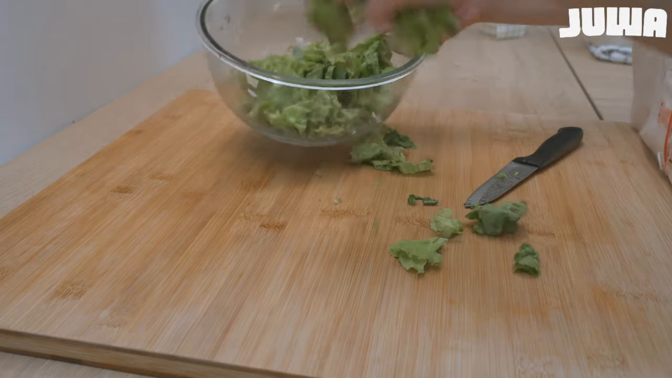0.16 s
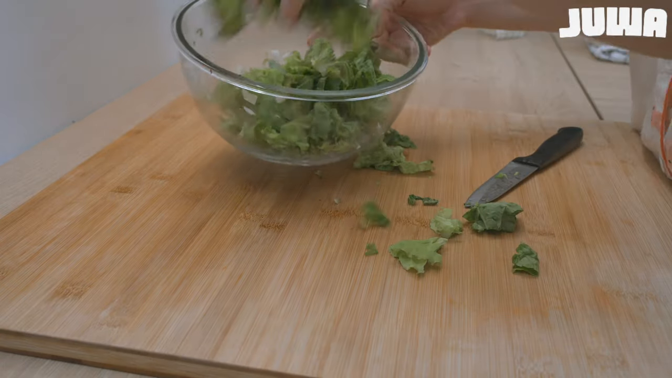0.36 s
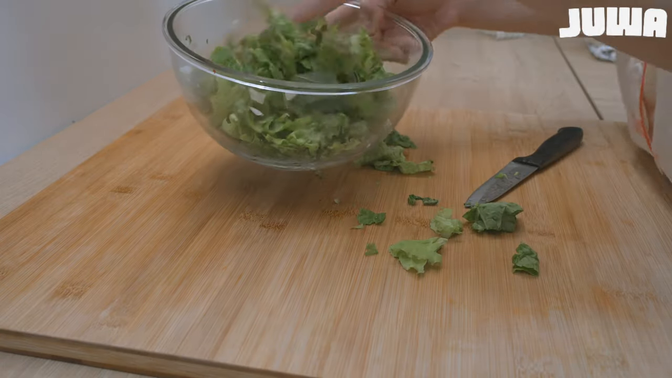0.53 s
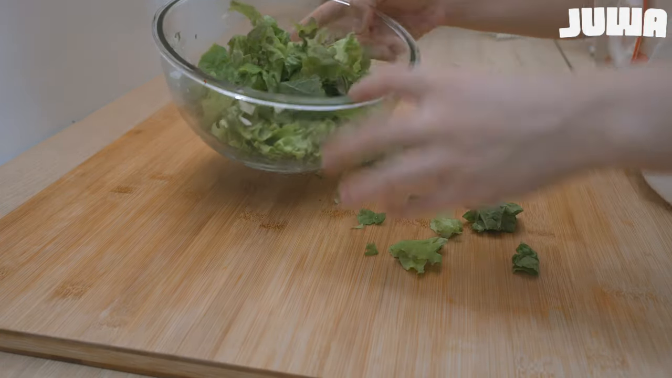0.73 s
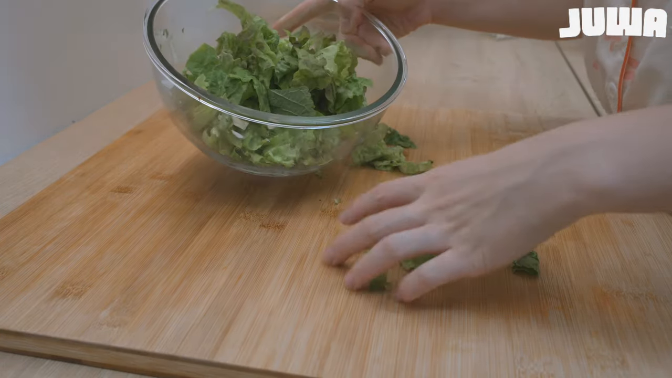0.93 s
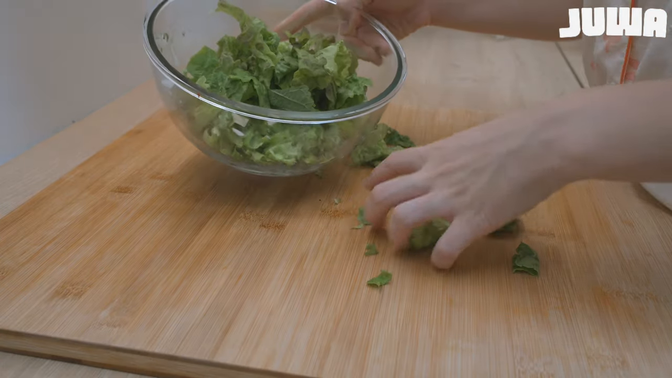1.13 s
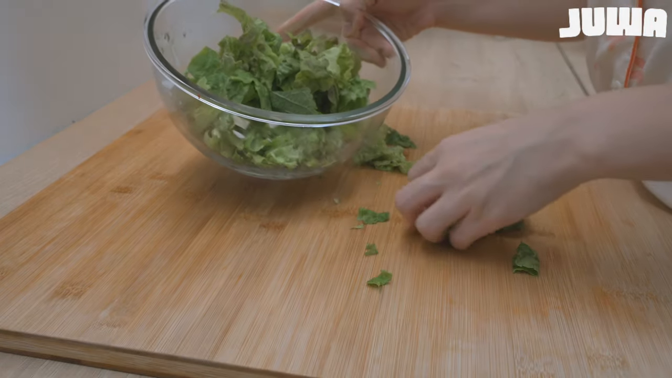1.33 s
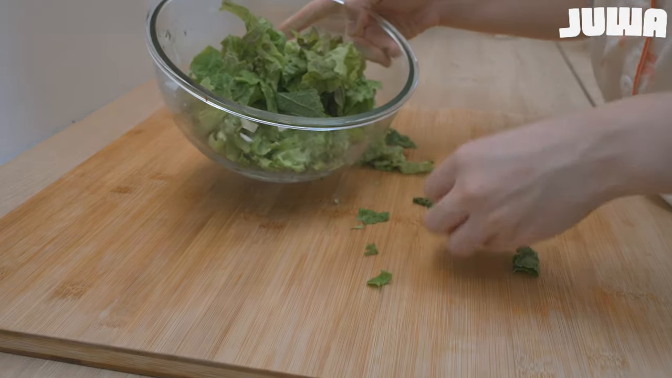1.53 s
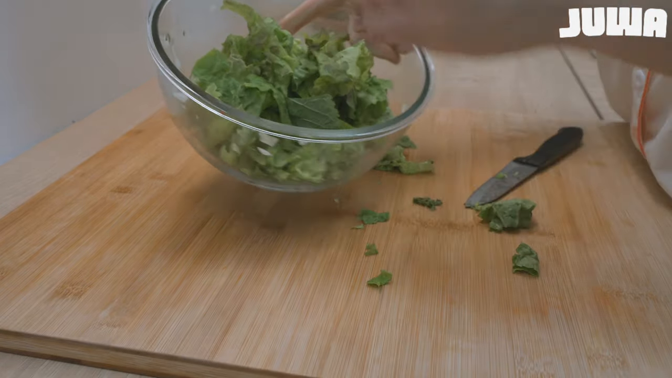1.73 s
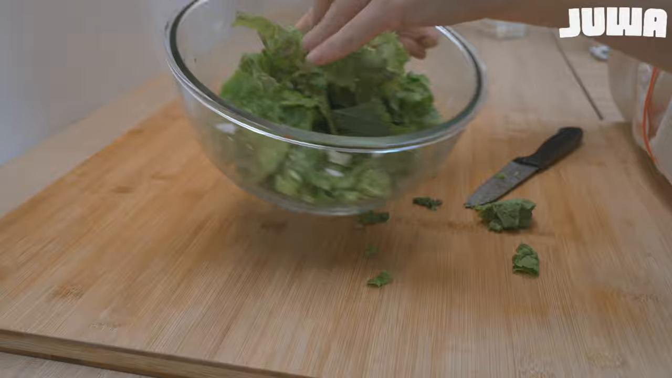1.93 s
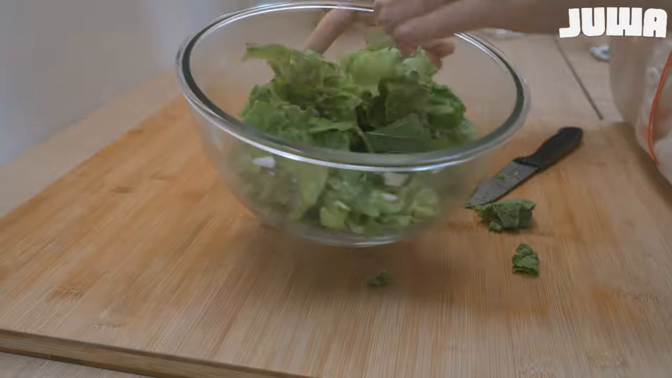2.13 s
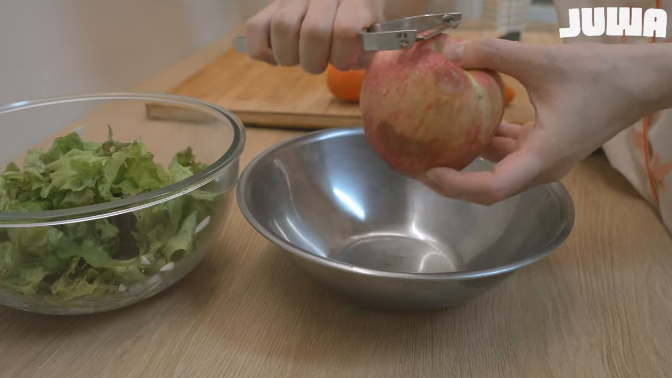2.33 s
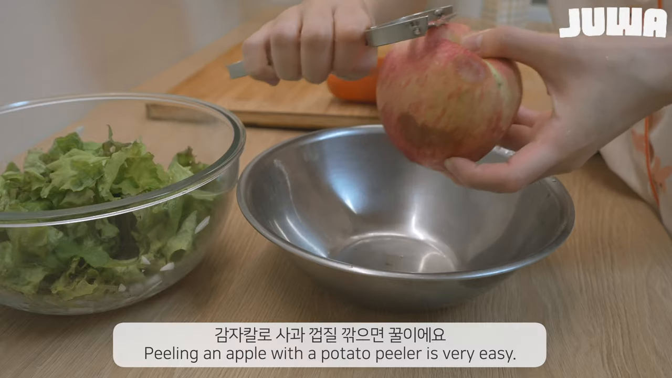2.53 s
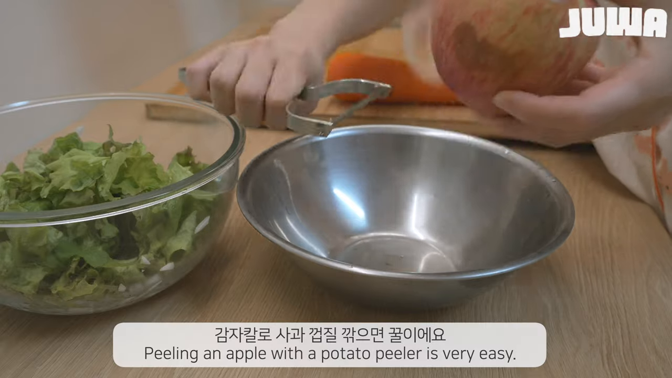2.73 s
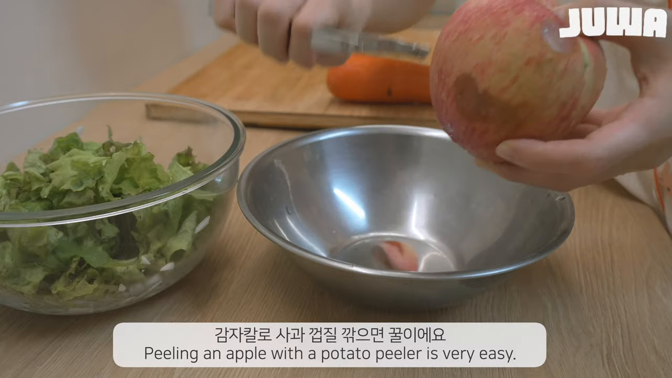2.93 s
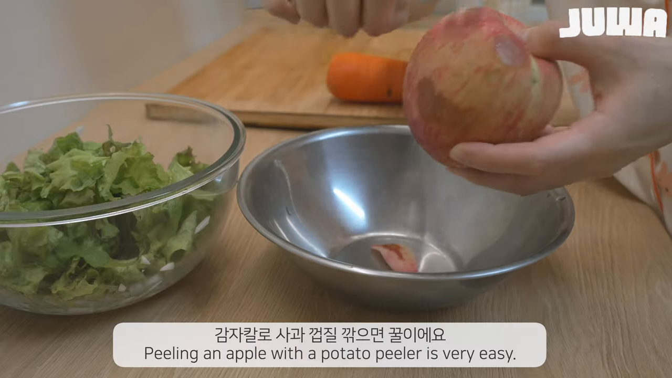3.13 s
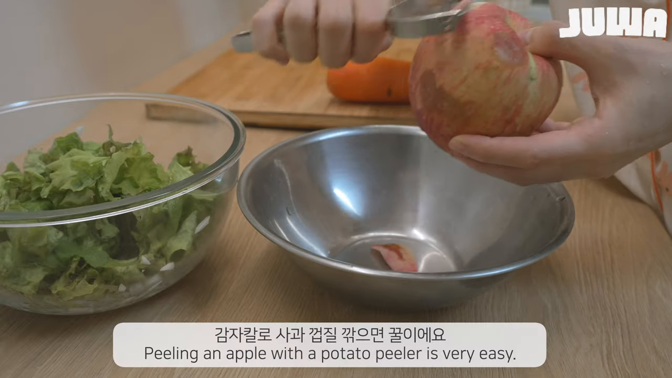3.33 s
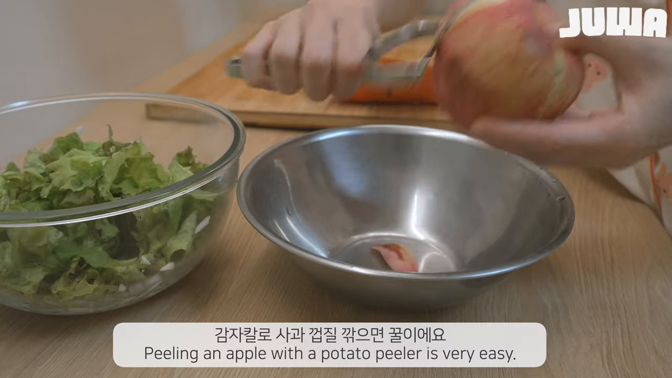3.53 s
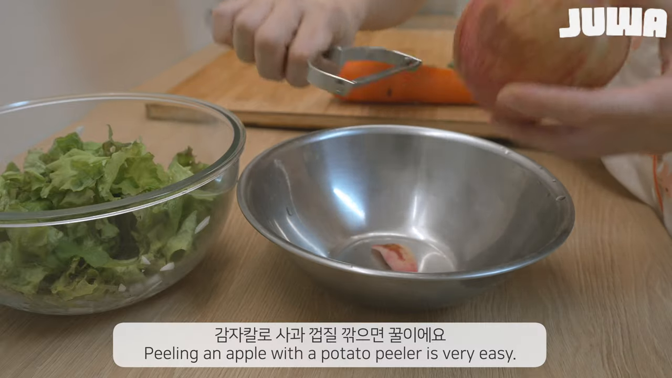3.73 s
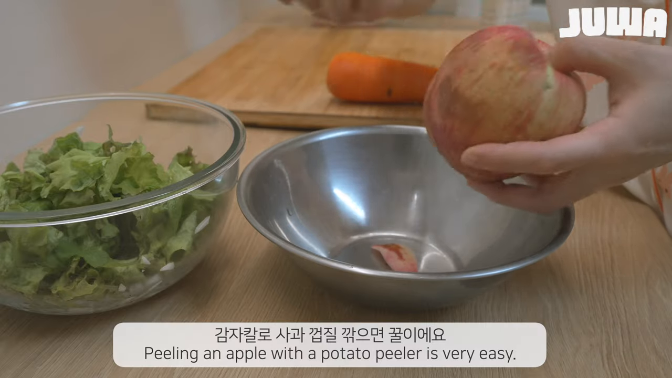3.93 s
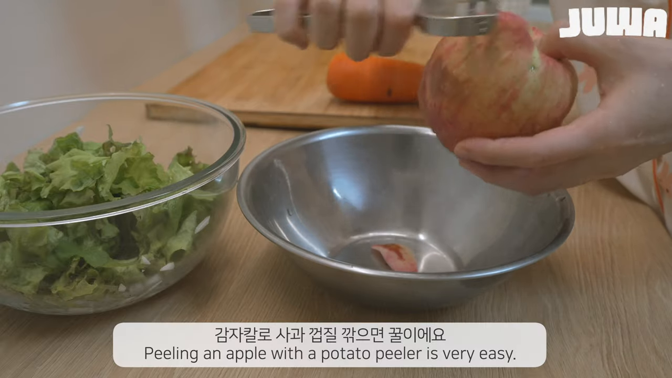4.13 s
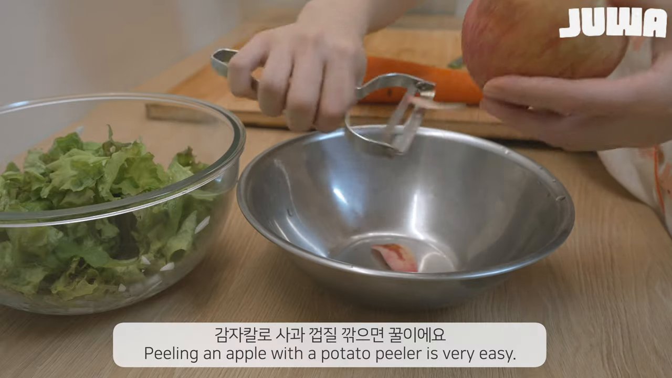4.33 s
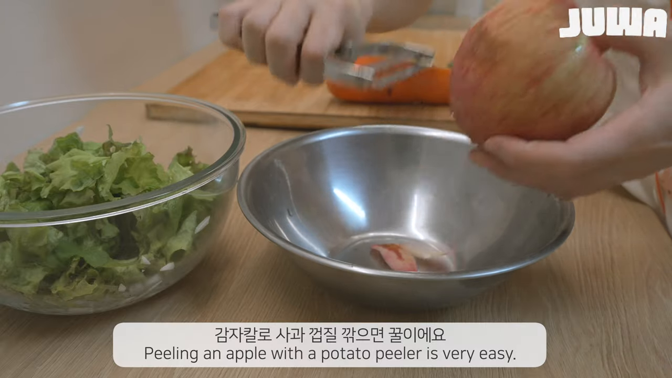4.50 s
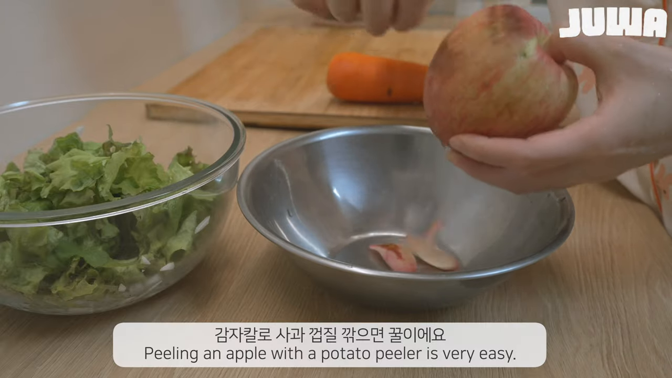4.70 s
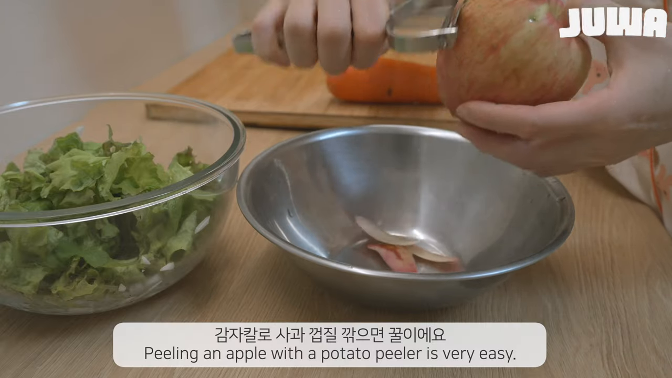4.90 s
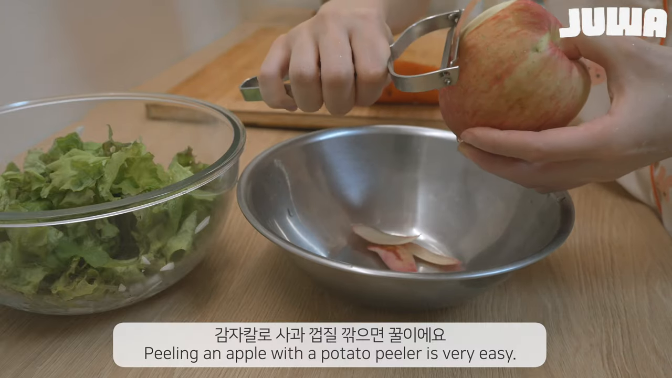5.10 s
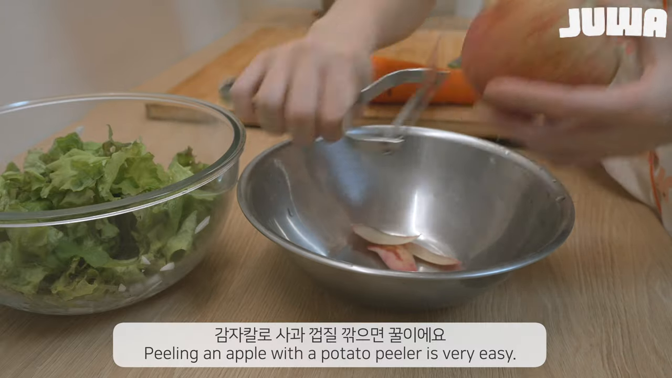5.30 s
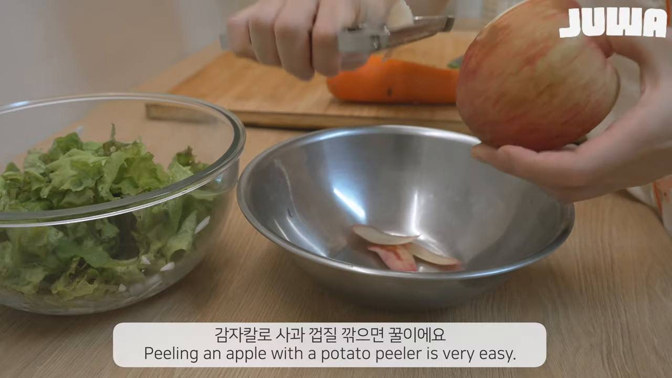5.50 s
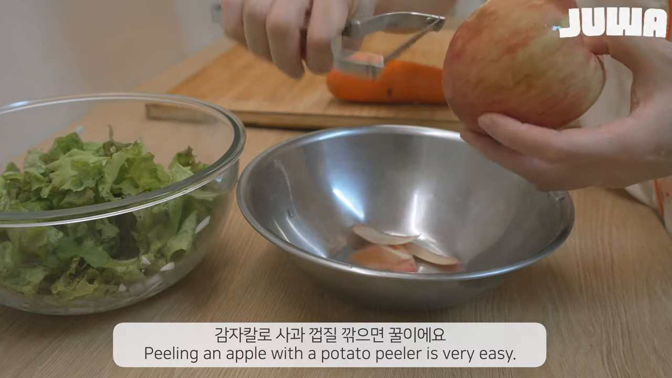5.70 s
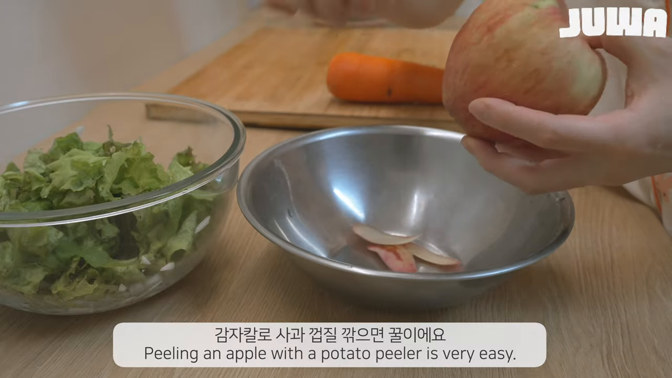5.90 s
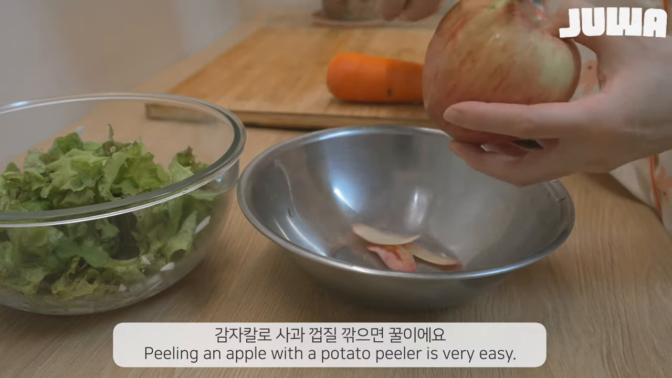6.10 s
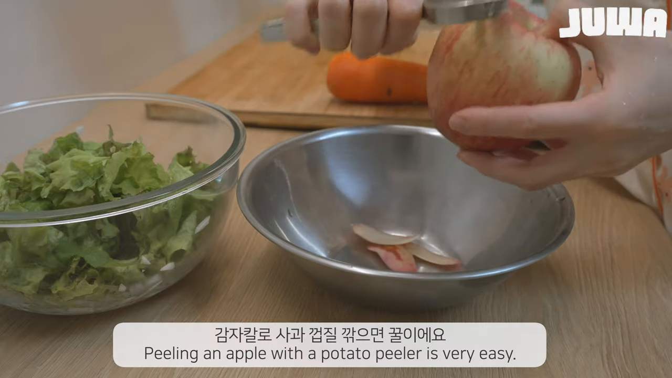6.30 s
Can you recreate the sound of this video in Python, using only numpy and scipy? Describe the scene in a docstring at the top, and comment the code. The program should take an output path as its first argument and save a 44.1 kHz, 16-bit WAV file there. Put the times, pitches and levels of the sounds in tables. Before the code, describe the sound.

Torn lettuce rustles softly into a glass bowl and off a wooden board, then a rattling metal peeler rasps an apple over a steel bowl.

```python
"""Kitchen work close to the microphone, built from random grains shaped by spectra and ringing modes.
First, torn lettuce crackles into a glass bowl, which rings briefly, and is swept up from a rubbed wooden board.
Then an apple is peeled: grains burst in a rasp, and the blade chatters in its ringing steel frame
as strokes land and leave, while strips of peel slap a steel bowl whose wall rings and base booms.
Dull bumps of the hand fall throughout; a small room answers over steady room tone."""
import sys
import numpy as np
from scipy import signal
from scipy.fft import rfft, irfft
from scipy.io import wavfile
from scipy.ndimage import uniform_filter1d

SR = 44100
rng = np.random.default_rng(int(sys.argv[2]) if len(sys.argv) > 2 else 0)


def file_out(sig):
    """Save sig as 16-bit WAV at sys.argv[1]."""
    # one column per channel
    cols = np.atleast_2d(sig).T
    # limit, then scale
    lim = np.clip(cols, -1, 1)
    pcm = np.round(lim * 32767).astype(np.int16)
    wavfile.write(sys.argv[1], SR, pcm)


N = 280035
TIME = np.arange(N) / SR
TOUCH_S = 0.0026  # time for the contact of a gesture to form


def gain_of(db):
    """Decibels to amplitude."""
    return 10 ** (np.asarray(db) / 20)


def evened(x):
    """Scales to rms 1."""
    return x / np.sqrt(np.mean(x ** 2) + 1e-20)


def wander(size):
    """Slow random swell of rms 1: noise averaged over a number of samples."""
    return evened(uniform_filter1d(rng.standard_normal(N), size=size))


def read(points, hz):
    """Reads a table on a log-frequency axis."""
    f, value = np.transpose(points)
    return np.interp(np.log(hz + 1), np.log(f + 1), value)


def add(mix, s, sound):
    """Mixes a sound in at time s."""
    part = mix[round(s * SR):][:len(sound)]
    part += sound[:len(part)]


def through(x, response):
    """Plays x through an impulse response, keeping the length of x."""
    return signal.fftconvolve(x, response)[:len(x)]


def band(x, lo_hz, hi_hz):
    """Band-pass."""
    edges = [lo_hz, min(hi_hz, SR / 2 - 1)]
    return signal.sosfilt(signal.butter(3, edges, "band", fs=SR, output="sos"), x)


def treble(x, corner_hz):
    """The part of x above a soft corner."""
    hz = np.fft.rfftfreq(len(x), 1 / SR)
    return irfft(rfft(x) * hz ** 4 / (hz ** 4 + corner_hz ** 4), len(x))


def colour(points, size=4096):
    """Causal response of energy 1 with the given spectrum."""
    hz = abs(np.fft.fftfreq(size, 1 / SR))
    log_gain = np.log(gain_of(np.maximum(read(points, hz), -100)))
    # the Hilbert transform of the log gain gives the minimum phase
    spectrum = np.exp(np.conj(signal.hilbert(log_gain)))
    response = np.fft.ifft(spectrum).real[:size // 2]
    return response / np.linalg.norm(response)


def body(modes, ring_db=0, drift=0):
    """Response of a driven object: the contact itself, then modes that each take a share of its energy."""
    t = TIME[:SR // 3]
    hz, db, t60 = np.transpose(modes)[:, :, None]
    hz = hz * (1 + drift * rng.standard_normal(hz.shape))
    rings = gain_of(-60 * t / t60) * np.cos(2 * np.pi * hz * t)
    rings = rings / np.linalg.norm(rings, axis=1, keepdims=True)
    response = (gain_of(db + ring_db) * rings).sum(0)
    response[0] += 1  # the contact itself
    return response / np.linalg.norm(response)


def struck(modes, tilt_db=0):
    """One blow: decaying modes of slightly random size, of which a harder contact favours the high ones."""
    t = TIME[:SR]
    hz, db, t60 = np.transpose(modes)[:, :, None]
    level_db = db + tilt_db * np.log2(hz) + rng.standard_normal(db.shape)
    size = gain_of(level_db) * rng.choice([-1, 1], db.shape)
    rings = gain_of(-60 * t / t60) * np.sin(2 * np.pi * hz * t)
    return (size * rings).sum(0) / np.linalg.norm(size)


def grains(per_s, spread_db, count=N):
    """Tiny random snaps; a wider spread makes a few of them much larger than the rest."""
    size = gain_of(spread_db * np.minimum(rng.exponential(1, count), 4))
    present = rng.random(count) < per_s / SR
    return evened(size * rng.choice([-1, 1], count) * present)


def pops(lo_hz, hi_hz, per_s, cycles, count=14):
    """Small fractures, each a few decaying cycles at one of a ladder of pitches."""
    t, out = TIME[:512], np.zeros(N)
    for hz in np.geomspace(lo_hz, hi_hz, count):
        pop = np.exp(-t * hz / cycles) * np.sin(2 * np.pi * hz * t)
        layer = signal.oaconvolve(grains(per_s, 1.2), pop)[:N]
        out += np.sqrt(hz) * evened(layer)
    return evened(out)


def chatter(length, rise, fade, per_s):
    """A burst of rapid contacts that lasts for a moment and dies away."""
    t = TIME[:SR // 8]
    shape = (1 - np.exp(-t / rise)) * np.exp(-np.maximum(t - length, 0) / fade)
    return shape * grains(per_s, 0.36, count=len(t))


def pressure(start, length, rise, first_db, fade):
    """One gesture: it touches lightly, builds to full force, holds and lets go."""
    t = np.maximum(TIME - start, 0)
    build = gain_of(first_db * np.maximum(1 - t / rise, 0))
    return np.minimum(t / TOUCH_S, 1) * build * np.exp(-np.maximum(t - length, 0) / fade)


def gestures(rows, first_db, fade):
    """Gain of a series of gestures, each at its own level."""
    return sum(gain_of(db) * pressure(s, length, rise, first_db, fade) for s, length, rise, db in rows)


# cuts of the blade through the skin: (t/s, length/s, rise/s, level/dB, brightness/dB)
CUTS = [(2.296, 0.024, 0.011, -52.5, 5.5), (2.329, 0.014, 0.0085, -35, -4), (2.413, 0.076, 0.038, -42, 1),
        (2.515, 0.093, 0.028, -34, 4.5), (2.605, 0.053, 0.021, -21.5, 6), (3.303, .14, 0.012, -27.5, 5.5),
        (3.481, .065, 0.0056, -51.5, 15.5), (3.526, 0.059, 0.017, -24, 6.5), (3.582, .007, 0.0033, -27, -1),
        (4.132, .157, 0.062, -28, 4), (4.781, 0.15, 0.088, -28, 3.5), (5.056, 0.092, 0.022, -49.5, 8.5),
        (5.154, 0.12, .012, -58, 15), (5.203, 0.014, .01, -46.5, 0), (5.261, 0.04, 0.039, -35.5, 8),
        (5.3, 0.0064, 0.0033, -23.5, -7), (6.09, 0.019, 0.0031, -40, 8), (6.233, 0.06, 0.029, -29, -2)]
# spectrum of blade on apple: (f/Hz, level/dB)
CUT_COLOUR = [(88, -79.5), (150, -27), (457, -18.5), (612, -8), (871, -6.5), (1140, -5.5), (1260, -1.5),
              (1760, -5), (2140, -2), (2650, -4.5), (4490, -9), (5570, -7.5), (7320, -10.5), (14800, -17),
              (16000, -21)]
# modes of the peeler while its blade is held in the apple: (f/Hz, level/dB, t60/s)
HELD_PEELER = [(715, -23, .04), (879, -19, .06), (1262, -18, .07), (2215, -23, .04), (2670, -23, .04),
               (2860, -24, .04), (5350, -22, .025), (5950, -22, .025)]
CUT_FIRST_DB, CUT_FADE_S = -16.5, 0.012  # the blade bites lightly at first and slips out quickly
SLIP_DB = 1.2  # unevenness of the crunch
DULL_DB, BITE_SHARE = -13.5, 0.2  # cuts start dull; share of the length that sets how fast they brighten


def cutting():
    """The blade bursts thousands of apple cells a second and tears the skin; the held peeler colours the rasp."""
    cells = grains(7000, 2.2) + .5 * pops(800, 6500, 220, 2.5)
    flesh = through(cells, colour(CUT_COLOUR))
    slips = wander(260)  # the blade catches and slips
    out = np.zeros(N)
    for s, length, rise, db, bright_db in CUTS:
        span = slice(round(s * SR), round((s + length + 10 * CUT_FADE_S) * SR))
        # a new grip for each cut
        rasp = through(flesh[span], body(HELD_PEELER, ring_db=-3.0, drift=0.0089))
        rasp = rasp / band(rasp, 530, 3070).std()
        fizz = treble(rasp, 3800)
        # slips swell the low crunch more than the fizz
        crunch = (rasp - fizz) * gain_of(SLIP_DB * slips[span])
        dulling_db = DULL_DB * np.exp((s - TIME[span]) / (BITE_SHARE * length))
        fizz = fizz * gain_of(bright_db + dulling_db + .5 * slips[span])
        force = pressure(s, length, rise, CUT_FIRST_DB, CUT_FADE_S)[span]
        out[span] += gain_of(db) * force * (crunch + fizz)
    return gain_of(-3.22) * out


# the loose blade chattering in its frame: (t/s, level/dB, length/s, brightness/dB)
CLACKS = [ (2.232, -53, 0.033, -4), (2.665, -16.5, 0.004, -12), (2.674, -18.5, 0.014, 0),
          (2.713, -26, 0.036, 3), (2.764, -27.5, .011, 2.5), (2.784, -33.5, 0.026, -1),
          (3.076, -35, 0.0045, -9), (3.227, -12.5, 0.0048, -4), (3.604, -12.5, 0.0061, 3.5),
          (3.64, -23, 0.0042, -3.5), (3.654, -25.5, 0.024, 2), (3.934, -41, 0.0097, -12),
          (3.954, -31.5, 0.031, -1.5), (4.092, -14, 0.0098, -3), (4.134, -28.5, .0022, -5),
          (4.283, -21.5, 0.014, -1.5), (4.398, -27, .015, 3.5), (4.7663, -9, 0.0026, -1.5),
          (5.31, -14.5, .0025, -3), (5.316, -23.5, .018, -8.5), (5.37, -21, .006, 5),
          (5.378, -14, 0.0096, 4.5), (5.401, -35.5, 0.036, -10), (5.454, -26.5, 0.0018, -19),
          (5.582, -46, 0.0042, 3), (5.818, -33.5, 0.046, -1.5), (5.93, -27, .022, 9),
          (6.042, -42.5, 0.0035, -17), (6.063, -35, 0.0039, -6), (6.09, -19.5, 0.021, 5.5),
          (6.106, -10.5, 0.0023, -3)]
# spectrum of the blade contacts: (f/Hz, level/dB)
CLACK_COLOUR = [(100, -32), (300, -11), (600, -14), (1250, -5), (1900, -10.5), (2900, 3), (4200, 2.5),
                (6000, 5.5), (8000, 3), (11500, 3.5), (14500, 4), (15500, 3.5)]
# modes of the free peeler: (f/Hz, level/dB, t60/s)
FREE_PEELER = [(1260, -20, .06), (2990, -19, .1), (3550, -26, .06), (4710, -24, .2), (5310, -19, .08),
               (5950, -14, .06), (6430, -16, .1), (7110, -22, .14), (8620, -19, .12), (9320, -24, .1),
               (9820, -19, .17), (10240, -16, .27), (10410, -16, .05), (12130, -13, .16),
               (13760, -16.5, .13), (15130, -18, .13), (15350, -15, .07)]


def peeler():
    """The swivel blade rattles against its stops; the ringing of the frame shifts a little with the grip."""
    out, contact = np.zeros(N), colour(CLACK_COLOUR)
    for s, db, length, bright_db in CLACKS:
        burst = through(chatter(length, 0.001, 0.004, 9000), contact)
        bright = burst + (gain_of(bright_db) - 1) * treble(burst, 9000)
        ring_db = -2.5 + 0.2 * bright_db + 100 * length  # bright, long rattles ring most
        frame = body(FREE_PEELER, ring_db=ring_db, drift=.005)
        level = gain_of(db + 2.0) * burst.std() / bright.std()
        add(out, s, level * signal.fftconvolve(bright, frame))
    return out


# the blade landing on the apple just before it swings over: (t/s, level/dB)
LANDINGS = [(3.2245, -39.5), (4.089, -28), (4.752, -46), (4.7632, -22.5), (6.085, -28.5)]


def landings():
    """A short, dull tick as the blade meets the skin, ringing the held peeler."""
    out = np.zeros(N)
    for s, db in LANDINGS:
        add(out, s, gain_of(db) * chatter(0.0016, 0.00048, 0.0011, 8000))
    return through(through(out, colour(CUT_COLOUR)), body(HELD_PEELER, ring_db=10.5))


# handfuls of lettuce lifted, dropped and gathered: (t/s, length/s, rise/s, level/dB)
RUSTLES = [(0.0, 0.017, 0.0013, -47.5), (.07, 0.28, 0.056, -51), (.378, 0.14, 0.025, -46),
           (.46, 0.039, 0.027, -39), (.55, .17, 0.037, -57), (.975, 0.27, 0.11, -49.5),
           (1.29, 0.062, .035, -44), (1.37, 0.14, .01, -57.5), (1.815, 0.14, 0.046, -53.5),
           (1.96, 0.31, .01, -60.5)]
# single ribs of lettuce snapping: (t/s, level/dB)
SNAPS = [(0.082, -51), (.268, -50), (.395, -49), (0.476, -36), (.8366, -44), (1.463, -38), (1.903, -41),
         (1.918, -38)]
# spectrum of the leaves: (f/Hz, level/dB)
LEAF_COLOUR = [(88, -57), (150, -10), (361, -8.5), (689, -2), (821, -8), (1190, -4), (1420, -6.5),
               (4080, -9), (6640, -13), (14500, -22), (16000, -40)]
LEAF_FIRST_DB, LEAF_FADE_S, LEAF_CLUMP_DB = -7.5, 0.026, 1.5  # first touch, settling, uneven crackle


def lettuce():
    """Leaves crackle in clumps as they bend and brush each other; now and then a rib snaps."""
    cracks = grains(6000, 3.2) + .6 * pops(900, 8000, 110, 2.5)
    clumps = gain_of(LEAF_CLUMP_DB * wander(240))
    crackle = through(cracks * clumps, colour(LEAF_COLOUR))
    crackle = crackle / band(crackle, 2660, 13500).std()
    snaps = np.zeros(N)
    for s, db in SNAPS:
        add(snaps, s, gain_of(db) * chatter(0.00084, .0001, 0.0011, 20000))
    handling = gestures(RUSTLES, LEAF_FIRST_DB, LEAF_FADE_S)
    return gain_of(-3.5) * handling * crackle + band(snaps, 1600, 10700)


# pushes of the hand over the board: (t/s, length/s, rise/s, level/dB)
RUBS = [(.965, 0.308, 0.1, -44), (1.06, 0.045, 0.041, -39), (1.292, 0.045, .006, -30.5),
        (1.352, 0.022, 0.026, -41), (1.39, 0.042, 0.0059, -48)]
# knocks of the hand on the board: (t/s, level/dB, length/s)
KNOCKS = [(0.94, -36, 0.0015), (1.284, -29, 0.012)]
# modes of the board: (f/Hz, level/dB, t60/s)
BOARD = [(718, -14, .05), (1042, -22, .03), (2370, -17, .02), (3300, -15, .02)]
# spectrum of contact with the wood: (f/Hz, level/dB)
WOOD_COLOUR = [(35, -63), (60, -15), (372, -8.5), (431, -15.5), (720, -3.5), (955, -11.5), (1610, -10),
               (1950, -16), (2400, -12), (2780, -17.5), (9000, -36.5), (11700, -36), (19800, -120)]
RUB_FIRST_DB, RUB_FADE_S = -13, 0.014  # first touch, letting go


def board():
    """Fingers and scraps rub and knock on the wood, gripping and letting go."""
    friction = grains(5000, 2.6)
    grip = gain_of(-1.0 + 2 * wander(700))
    drive = grip * gestures(RUBS, RUB_FIRST_DB, RUB_FADE_S) * friction
    for s, db, length in KNOCKS:
        add(drive, s, gain_of(db) * chatter(length, 0.00024, 0.0035, 7000))
    wood = through(body(BOARD), colour(WOOD_COLOUR))
    return through(drive, wood / np.linalg.norm(wood))


# taps on the glass bowl: (t/s, level/dB)
GLASS_TAPS = [(.7372, -36), (0.7575, -28)]
# modes of the glass bowl: (f/Hz, level/dB, t60/s)
GLASS = [(538, 1, .17), (1324, -1, .17), (2400, -3.5, .17), (3740, -7, .08), (5310, -13, .12),
         (7100, -18, .11), (8560, -23, .06), (9070, -22, .08)]


def glass_bowl():
    """The glass bowl rocks on the board and rings briefly, damped by the hand that holds it."""
    out, wood = np.zeros(N), colour(WOOD_COLOUR)
    for s, db in GLASS_TAPS:
        out = out * (TIME < s)  # each new contact stops the ringing of the one before
        add(out, s, gain_of(db + 2.0) * struck(GLASS))
        knock = band(chatter(0.0015, 0.0003, 0.0016, 8700), 580, 14000)
        add(out, s, gain_of(db) * through(knock, wood))
    return out


# peel dropping into the steel bowl: (t/s, ring level/dB, boom level of the base/dB, hardness/dB per octave)
DROPS = [(2.897, -24, -34, -2.5), (2.931, -51, -44.5, 14), (2.983, -41.5, -49.5, 1), (3.005, -40.5, -63, 0),
         (4.533, -44.5, -48, 2), (4.552, -35, -47, 3), (4.631, -39.5, -76, 6), (5.729, -25.5, -28.5, -0.5),
         (5.8885, -23.5, -45, 6)]
# modes of the steel wall: (f/Hz, level/dB, t60/s)
STEEL = [(640, -14, .06), (790, -32, .9), (880, -13, .04), (1200, -6, .05), (1345, 0, .045),
         (1318, -17, .35), (1460, -7, .025), (1838, -14, .1), (2579, -24, .3), (2690, -20, .45),
         (3020, -13, .03), (3350, -14, .03), (3770, -16, .05), (4325, -11, .04), (5010, -16, .05),
         (6360, -17, .05), (7135, -18, .09), (7450, -15, .07), (7820, -18, .05)]
# modes of its flat base: (f/Hz, level/dB, t60/s)
BASE = [(136, 0, .17), (225, -17, .1)]


def steel_bowl():
    """Wet peel slaps the thin steel: the wall rings and the base booms."""
    out = np.zeros(N)
    swell = 1 - np.exp(-TIME[:SR] / 0.00098)  # the boom starts softly
    for s, ring_db, boom_db, hardness_db in DROPS:
        slap = band(chatter(0.00054, 0.00018, 0.00094, 8000), 900, 9700)
        add(out, s, gain_of(ring_db + hardness_db + 1.0) * slap)
        add(out, s, gain_of(ring_db) * struck(STEEL, hardness_db))
        add(out, s + 0.0028, gain_of(boom_db) * struck(BASE) * swell)
    return out


# dull bumps of the hand: (t/s, level/dB, t60/s)
BUMPS = [(0.941, -44, 0.39), (1.283, -41, 0.32), (2.733, -37.5, 0.5), (5.369, -26, 0.33)]
# spectrum of the bumps: (f/Hz, level/dB)
BUMP_COLOUR = [(25, -21.5), (45, -10), (68, -5), (100, -9), (140, -7), (220, 0), (290, -10.5), (340, -6),
               (600, -12), (850, -17), (1500, -55), (4000, -75)]


def bumps():
    """Soft, low jolts: a push lasting a few hundredths of a second, then a weaker rumble."""
    out, t = np.zeros(N), TIME[:SR // 2]
    for s, db, t60 in BUMPS:
        add(out, s, gain_of(db) * chatter(0.011, 0.00073, 0.015, 3000))
        rumble = gain_of(db - 1.5 - 60 * t / t60) * grains(2500, 0.34, count=len(t))
        add(out, s, rumble)
    return through(out, colour(BUMP_COLOUR))


# decay of the room: (f/Hz, t60/s)
ROOM = [(100, 0.67), (500, 0.48), (2000, 0.36), (6000, 0.4), (15000, 0.29)]


def room(x, delay=0.0069):
    """Sparse reflections of random sign, each band dying at its own speed."""
    taps = grains(4000, 0, count=SR) * (TIME[:SR] > delay)
    hz, t, z = signal.stft(taps, SR, nperseg=256)
    decay = gain_of(-60 * t / read(ROOM, hz)[:, None])
    tail = signal.istft(z * decay, SR, nperseg=256)[1]
    return through(x, tail / np.linalg.norm(tail))


# spectrum of the room tone: (f/Hz, level/dB)
FLOOR = [(15, -44), (25, -1.5), (92, 1), (206, -0.5), (293, -5), (344, -4), (463, -7.5), (591, -9),
         (695, -7), (818, -11), (1230, -12), (14800, -28), (16000, -60)]


def room_tone():
    """Steady random noise with the spectrum of the quiet room."""
    return gain_of(-59.5) * evened(through(rng.standard_normal(N), colour(FLOOR)))


def scene():
    """All the handling, its reflections and the room tone."""
    salad = lettuce() + board() + glass_bowl()
    apple = cutting() + landings() + peeler()
    knocks = steel_bowl() + bumps()
    echo = room(gain_of(-11.5) * salad + gain_of(-14) * apple + gain_of(-9.0) * knocks)
    return (salad + apple + knocks + echo + room_tone())[None]


EDGE_HZ = 15880  # top of the audible band


def record(dry):
    """The recorder's band limit: a steep low-pass without delay."""
    low_pass = signal.firwin(401, EDGE_HZ, window=("kaiser", 8), fs=SR)
    return signal.oaconvolve(dry, low_pass[None], "same")


dry = scene()
out = record(dry)
file_out(out)
```